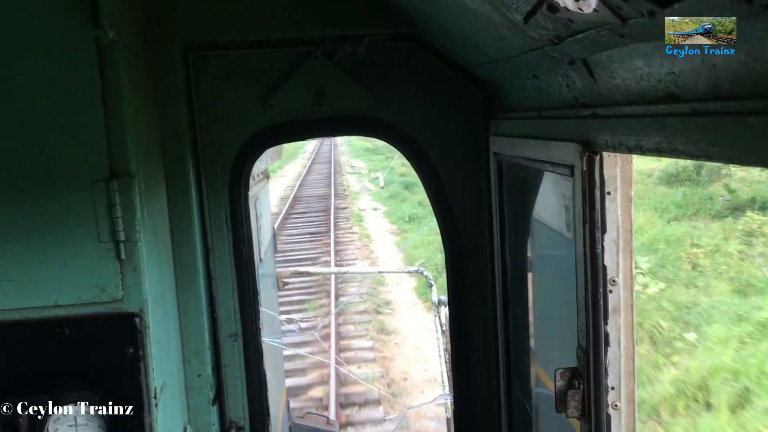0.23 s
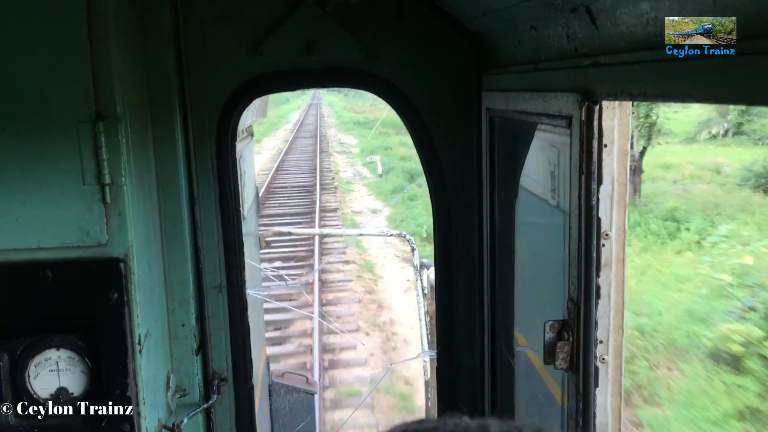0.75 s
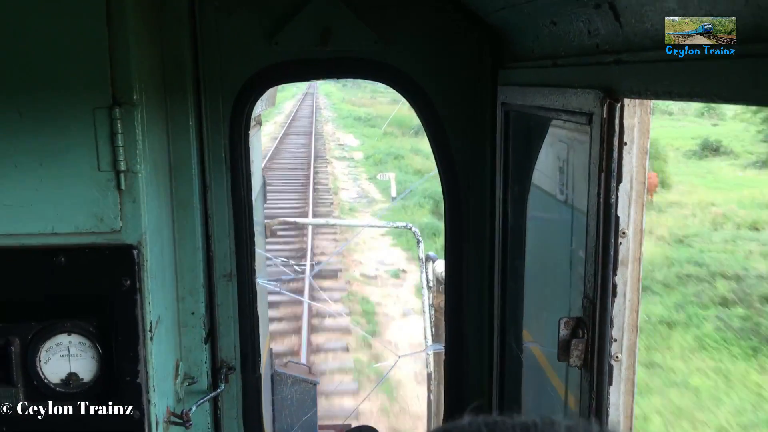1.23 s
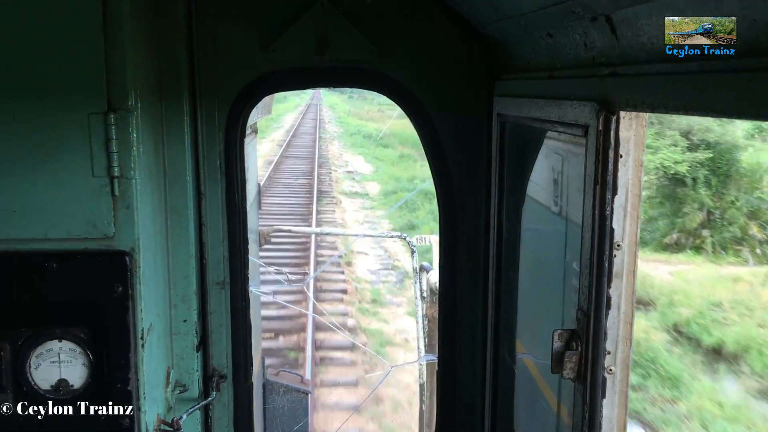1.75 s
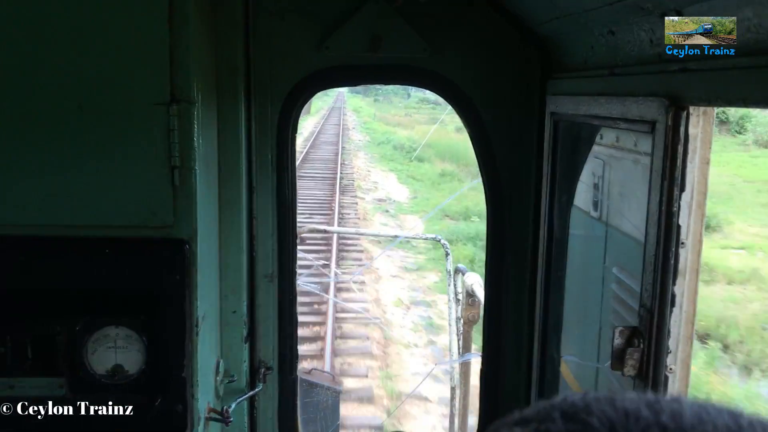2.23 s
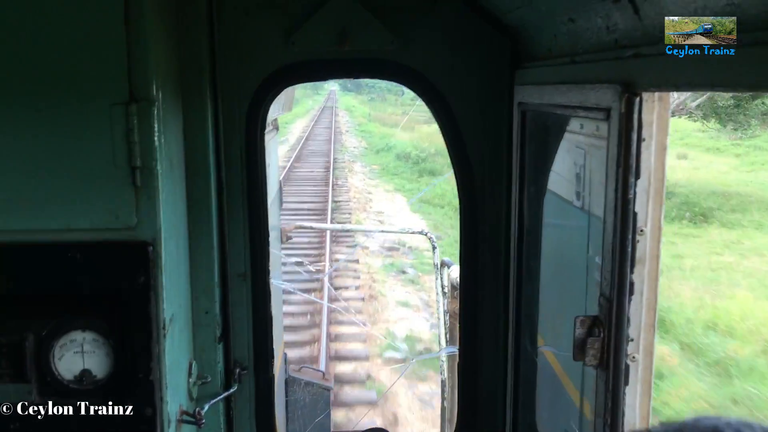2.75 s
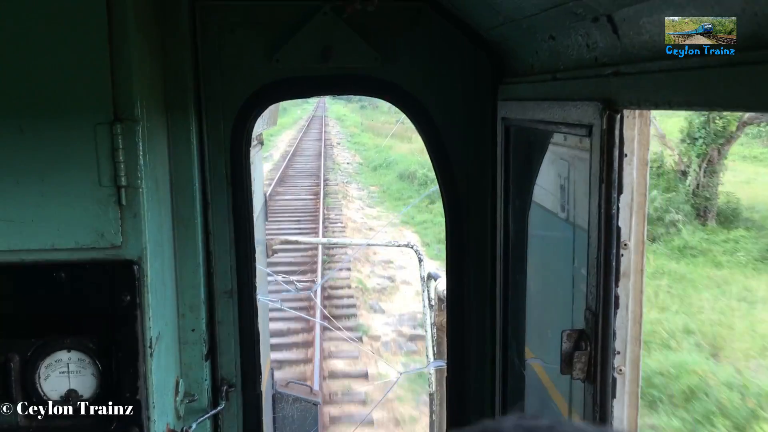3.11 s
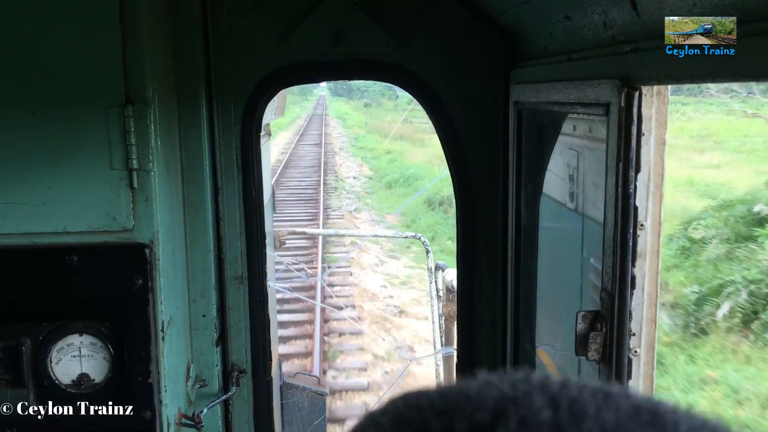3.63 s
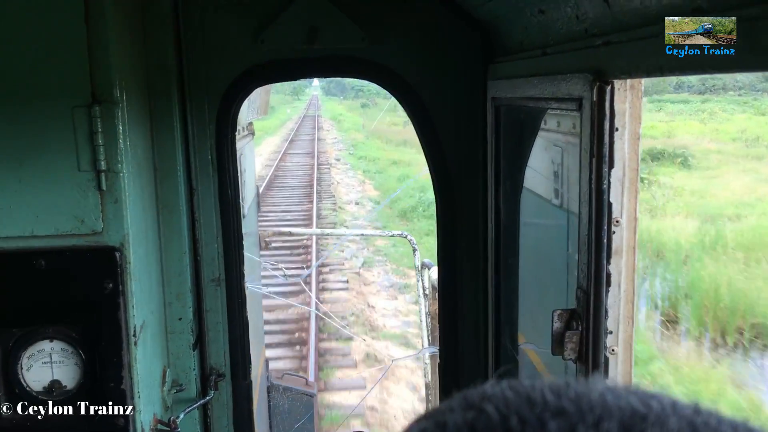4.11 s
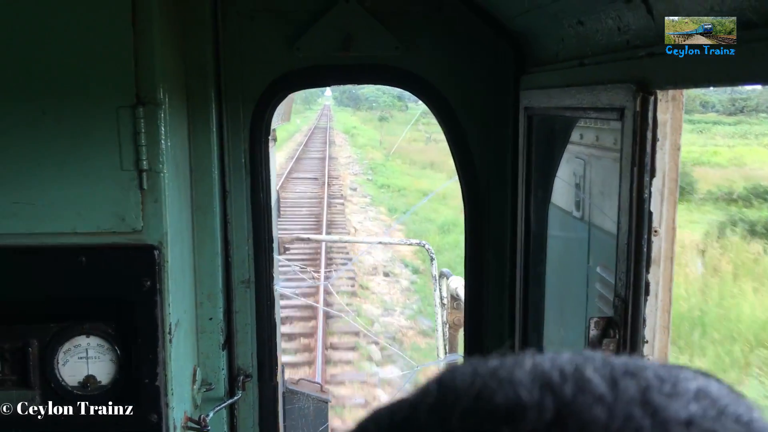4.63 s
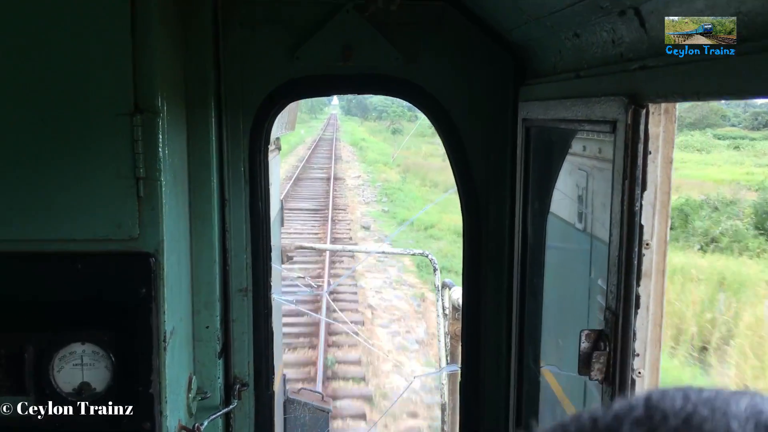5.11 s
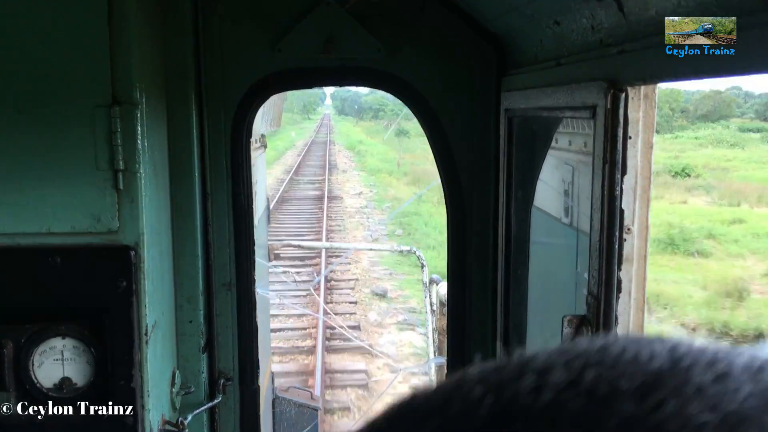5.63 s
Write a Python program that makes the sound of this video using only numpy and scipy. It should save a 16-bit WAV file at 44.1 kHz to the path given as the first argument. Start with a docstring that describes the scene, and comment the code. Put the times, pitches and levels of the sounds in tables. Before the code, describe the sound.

A running train heard from the driver's cab, in mono, close to vibrating metal. The bass-heavy engine hum holds constant speed, fluttering about ten times a second, with blower tones beating slowly against it. Thin high whines waver above. Small metal parts tick and sizzle irregularly, while triple wheel clatters recur just under once a second, stronger and ringing more in places, among stray knocks and soft thuds.

```python
"""Inside the steel cab of a diesel-electric locomotive at steady power, door and window open.
The engine is a set of steady tones that line up in one throb a crank turn; a blower's tones beat against it.
Gears whine as wavering tones. Loose fittings rattle in the treble: noise let through in short taps and made
to ring. Three-axle bogies (wheel sets) knock over rail joints with bursts of noise, dry taps and low thuds.
Behind it all lies the roar of engine room and track, noise whose bands flicker."""
import sys
import numpy as np
from scipy import signal
from scipy.fft import rfft, irfft
from scipy.io import wavfile
from scipy.ndimage import uniform_filter1d

SR = 44100
rng = np.random.default_rng(int(sys.argv[2]) if len(sys.argv) > 2 else 0)


def master(y):
    """Save y as 16-bit WAV."""
    cut = np.clip(np.atleast_2d(y).T, -1, 1)
    pcm = np.round(cut * 32767)  # scale
    wavfile.write(sys.argv[1], SR, pcm.astype(np.int16))


def decibels_to_gain(level_db):
    """Convert a level in decibels to a linear amplitude gain (20 dB per decade)."""
    exponent = np.asarray(level_db, float) / 20
    return 10 ** exponent


N = 258426
t = np.arange(N) / SR  # time of each sample, s

# engine tones: (multiple of crank speed, mean rms level [dB])
CRANK_ORDERS = [(3, -57), (4, -44), (5, -35.3), (6, -33.8), (7, -40.6), (8, -30.7), (8.5, -49), (9, -22.0),
                (9.5, -46.5), (10, -38.6), (11, -32.7), (13, -53), (14, -50), (15, -37.5), (16, -53),
                (17, -53), (19, -54), (20, -53)]
# blower tones: (multiple of lobe rate, mean rms level [dB])
BLOWER_ORDERS = [(1, -35.4), (2, -33.6), (3, -49), (13, -57), (16, -60), (18, -64)]
# other meshing gears on the same gear train: (teeth, level against the main mesh [dB])
SIDE_MESHES = [(39, -4), (78, -12), (79, -4), (158, -9.5)]
# how hard the cab shakes: (time [s], level about the usual [dB])
SHAKE = [(0.0, -1), (0.55, .5), (1.32, 1), (1.88, .5), (2.12, -1.5), (2.9, -1.5), (3.16, 1), (3.93, 1),
         (4.49, 0), (4.83, 1), (5.11, 0.5), (5.58, -1.5), (5.86, 2.5)]
# what the loose fittings ring with: (pitch [Hz], width [Hz], level [dB])
FITTINGS = [(3337, 80, -8.5), (5300, 560, -11), (6650, 310, -5), (8050, 560, -9.5), (9510, 390, -4.5),
            (10400, 300, -11.5), (11360, 480, -11.5), (12600, 2700, -9.5)]
# loudest rattles of loose fittings: (time [s], strike [dB], favoured pitch [Hz])
RATTLES = [(0.0398, -15, 11800), (0.1795, -17, 7980), (0.4946, -15, 11300), (0.5282, -14, 11500),
           (0.6195, -18.5, 9460), (0.9892, -17, 6540), (1.0799, -19, 9500), (1.51, -16, 9600),
           (1.601, -16, 6610), (1.8936, -17.5, 8240), (1.9768, -14, 9510), (2.7355, -15.5, 9980),
           (2.88, -16, 9630), (2.9896, -21, 6860), (3.061, -16, 9510), (3.3404, -15, 9640),
           (3.3987, -19, 9600), (3.926, -16.5, 9320), (4.0076, -17.5, 9660), (4.457, -15.5, 9470),
           (4.6049, -16, 9740), (4.9871, -18, 8050), (5.234, -19, 9500), (5.7578, -18.5, 9580)]
# a bogie crosses a rail joint, one rail length after the last:
# (first axle [s], clatter peak [dB], fall per axle [dB], ring against clatter [dB], sharpness [dB per octave])
RAIL_JOINTS = [(0.415, -33.5, 0.5, -10, -5), (1.289, -32.5, 1.5, -28, -4), (2.171, -29, 3.5, -5, -2.5),
               (3.05, -28, 2, -10, -2.5), (3.931, -29.5, 1.5, -0.5, -2), (4.812, -30, 7.5, 5.5, -2),
               (5.688, -32, 12, 2.5, -1)]
# wheel and frame after a blow: (pitch [Hz], width of one filter pass [Hz], level before sharpness [dB])
FRAME_RINGS = [(600, 600, -1), (970, 450, 0), (1500, 700, -2), (1900, 500, -4), (2600, 800, -11),
               (3500, 600, -14)]
# dry taps under the floor: (time [s], peak [dB])
KNOCKS = [(0.356, -41), (0.805, -35), (3.153, -29), (4.032, -28.5), (4.581, -34), (4.625, -33),
          (4.759, -27), (5.377, -33), (5.841, -40)]
# the floor thuds as the body settles on its springs: (time [s], strike [dB])
THUDS = [(0.415, -41), (0.519, -38), (1.229, -25.5), (1.289, -26.5), (1.425, -32), (3.931, -31),
         (4.035, -33), (4.812, -25), (5.687, -31)]
# colour of the roar of engine room and rolling wheels: (frequency [Hz], relative level [dB per Hz])
ROAR_COLOUR = [(20, -24), (32, -19), (45, -9), (70, -6), (100, -4.5), (130, -9), (190, -13), (240, -15.5),
               (295, -12.5), (325, -14), (350, -14), (480, -24), (550, -19), (700, -25.5), (1100, -32.5),
               (2000, -35.5), (3000, -42.5), (4300, -45), (9000, -41), (15500, -53)]

CRANK_HZ, THUMP_S = 9.8805, .052  # crank turns per second; time of the first thump


def level(x, db):
    """Scale a sound to an rms level in dB."""
    return x * decibels_to_gain(db) / np.sqrt(np.mean(x ** 2))


def band(x, hz, width):
    """A resonance, with gain 1 at its centre."""
    return signal.lfilter(*signal.iirpeak(hz, hz / width, fs=SR), x)


def walk(rate):
    """A random wander: levels held for 1 / rate s, then smoothed twice; spread near 1."""
    hold = int(SR / rate)
    steps = np.repeat(rng.standard_normal(N // hold + 1), hold)
    return 1.09 * uniform_filter1d(uniform_filter1d(steps, hold), hold)[:N]


def tone(turns, db):
    """A cosine that has made this many turns, at an rms level in dB."""
    return np.sqrt(2) * decibels_to_gain(db) * np.cos(2 * np.pi * turns)


def shake_db():
    """How hard the cab shakes at each moment, in dB."""
    return np.interp(t, *np.transpose(SHAKE))


def engine(waver_db=.5, slip_turns=.006):
    """Crank orders line up in one thump a turn; the deepest come early, through the steel frame."""
    frame_early_s, frame_below_hz, lead_rad = .0225, 74, -1.7
    out = 0
    for order, db in CRANK_ORDERS:
        hz = order * CRANK_HZ
        early_s = frame_early_s * (hz < frame_below_hz)
        turns = hz * (t - THUMP_S + early_s) + lead_rad / (2 * np.pi)
        out = out + tone(turns + slip_turns * walk(4.85), db + waver_db * walk(5.6))
    return out


def blower(lobe_hz=58.545, start_turn=.88, waver_db=.52):
    """A geared rotor a little under the sixth crank order, so the two beat slowly."""
    return sum(tone(order * lobe_hz * t + start_turn, db + waver_db * walk(6)) for order, db in BLOWER_ORDERS)


def gears(throb_db=-0.1):
    """Tooth whines on one gear train flutter; the main one also follows shaking and crank load pulses."""
    main_teeth, start_db, ease_db_per_s = 138, -48, 0.74  # the load slowly eases
    db = start_db - ease_db_per_s * t + 0.78 * shake_db()
    shaft_turns = CRANK_HZ * np.cumsum(1 + .0008 * walk(2)) / SR
    load_db = db + throb_db * np.cos(2 * np.pi * CRANK_HZ * (t - THUMP_S))
    out = tone(main_teeth * shaft_turns + .03 * walk(25), load_db + 1.4 * walk(30))
    for teeth, against_main_db in SIDE_MESHES:
        turns = teeth * shaft_turns + rng.random() + 0.03 * walk(25)
        out += tone(turns, np.mean(db) + against_main_db + 1.3 * walk(18))
    # a wheel-driven mesh, smeared by the play of the axle
    smeared = band(rng.standard_normal(N), 2152., 7.9)
    return out + level(smeared, -60.0)


def smear(taps, decay_s):
    """Let each tap die away instead of stopping at once."""
    return signal.lfilter([1], [1, -np.exp(-1 / (decay_s * SR))], taps)


def rattle(taps_per_s=220., spread_db=5.5, decay_s=.0028, hiss_db=-4., loud_decay_s=.0045):
    """Small metal parts chatter: dense uneven taps; each tap favours some resonances over others."""
    chatter_db = -45  # rms at usual shaking, before the top is softened
    soft_count, soft_db = 36, -19.5  # softer rattles at chance moments; their hardest strike
    chance = rng.random((soft_count, 3))
    soft = [(a * t[-1], soft_db - 1.1 * b, 6500 * 2 ** (0.61 * c)) for a, b, c in chance]
    happens = rng.random(N) < taps_per_s / SR * decibels_to_gain(1.6 * walk(60))
    taps = happens * decibels_to_gain(spread_db * rng.uniform(-0.62, 1, size=N))
    chatter, loud_rattles = 0, 0
    for hz, width, db in FITTINGS:
        favour = decibels_to_gain(10.5 * rng.uniform(-1.1, 1, size=N))
        gate = level(smear(taps * favour, decay_s), 0) + decibels_to_gain(hiss_db)  # steady hiss between taps
        chatter = chatter + decibels_to_gain(db) * band(rng.standard_normal(N) * gate, hz, width)
        strikes = np.zeros(N)
        for s, strike_db, strike_hz in RATTLES + soft:
            octaves_off = abs(np.log2(hz / strike_hz))
            strikes[int(s * SR)] = decibels_to_gain(strike_db - 15.0 * octaves_off)
        burst = rng.standard_normal(N) * smear(strikes, loud_decay_s)
        loud_rattles = loud_rattles + decibels_to_gain(db) * band(burst, hz, width)
    # little rings above the last resonance
    soften_top = signal.butter(N=5, Wn=13700., fs=SR, output="sos")
    return signal.sosfilt(soften_top, decibels_to_gain(shake_db()) * level(chatter, chatter_db) + loud_rattles)


def joints():
    """Each wheel drop is a burst of broad clatter through the frame and a wheel ring."""
    axle_gap_s, clatter_s, ring_hz, ring_s = .103, 0.03, 1316, .013
    size = SR // 4
    out, u = np.zeros(N + SR), np.arange(size) / SR
    ring = np.sin(2 * np.pi * ring_hz * u) * np.exp(-u / ring_s) * (1 - np.exp(-u / 0.0045)) ** 2
    for s, db, fall_db, ring_db, sharp_db in RAIL_JOINTS:
        for axle in range(3):
            push = rng.standard_normal(size) * np.exp(-u / clatter_s) * (1 - np.exp(-u / 0.00056))
            clatter = 0
            for hz, width, frame_db in FRAME_RINGS:
                gain = decibels_to_gain(frame_db + sharp_db * np.log2(hz / ring_hz))
                clatter = clatter + gain * band(band(push, hz, width), hz, width)
            blow = clatter / abs(clatter).max() + decibels_to_gain(ring_db) * ring
            i = int((s + axle * axle_gap_s) * SR)
            out[i:i + size] += decibels_to_gain(db - axle * fall_db) * blow
    return out[:N]


def knocks(decay_s=0.0024):
    """Slack in the running gear closes with single dry taps: short noise through one resonance."""
    out, u = np.zeros(N + SR), np.arange(SR // 20) / SR
    for s, db in KNOCKS:
        tap = rng.standard_normal(len(u)) * np.exp(-u / decay_s)
        for _ in range(3):  # three passes make the resonance steeper
            tap = band(tap, 1150., 820.0)
        i = int(s * SR)
        out[i:i + len(u)] += decibels_to_gain(db) * tap / abs(tap).max()
    return out[:N]


def thuds(hz=296.3, decay_s=0.024):
    """One low floor mode, softly struck: a sine that swells quickly and dies away."""
    blows, u = np.zeros(N), np.arange(SR // 4) / SR
    for s, db in THUDS:
        blows[int(s * SR)] = decibels_to_gain(db)
    thud = np.sin(2 * np.pi * hz * u) * np.exp(-u / decay_s) * (1 - np.exp(-u / 0.0027))
    return signal.fftconvolve(blows, thud)[:N]


def roar(rms_db=-30):
    """Noise bands flicker alone; the low middle also pulses with the crank and swells with the shaking."""
    hz, db = np.transpose(ROAR_COLOUR)
    f = np.arange(N // 2 + 1) * SR / N + 1  # 1 Hz added so the logarithm exists
    noise = rfft(rng.standard_normal(N)) * decibels_to_gain(np.interp(np.log(f), np.log(hz), db))
    swell = 0.48 * shake_db()
    pulse = 0.21 * np.cos(2 * np.pi * CRANK_HZ * (t - .06)) + 1.8 * walk(60)
    out = 0
    for octave in np.arange(4, 14.5, .5):  # band centres in octaves above 1 Hz
        share = np.clip(1 - 2 * abs(np.log2(f) - octave), 0, 1)  # neighbours overlap
        middle = np.exp(-((octave - 8.6) / 2.2) ** 2)
        gain = decibels_to_gain(middle * (swell + pulse) + 0.66 * walk(9))
        out = out + gain * irfft(noise * share, N)
    return level(out, rms_db)


def scene():
    """Everything heard at one point in the cab, as one channel."""
    mix = engine() + blower() + gears() + rattle() + joints() + knocks() + thuds() + roar()
    return mix[None]


def top_cut(x):
    """Nothing passes above the cut-off."""
    return signal.sosfilt(signal.butter(12, 15730, fs=SR, output="sos"), x)


def record(dry):
    """A steep filter cuts the treble above 15730 Hz."""
    cut_top = signal.ellip(10, .2, 80, 15730, fs=SR, output="sos")
    mix = signal.sosfilt(cut_top, dry)
    return top_cut(mix)


dry = scene()
out = record(dry)
master(out)
```